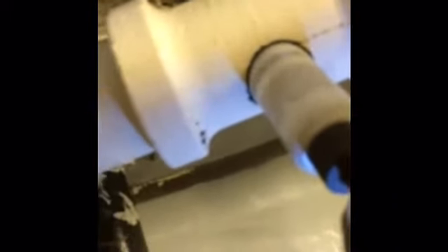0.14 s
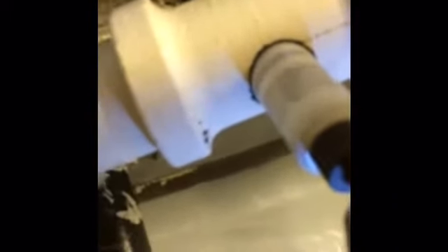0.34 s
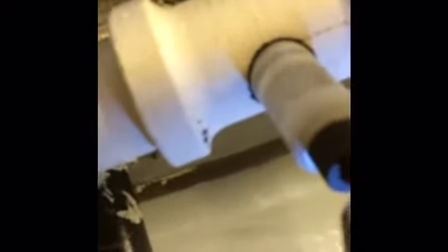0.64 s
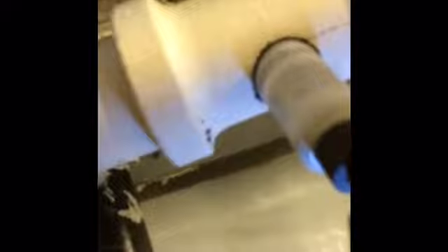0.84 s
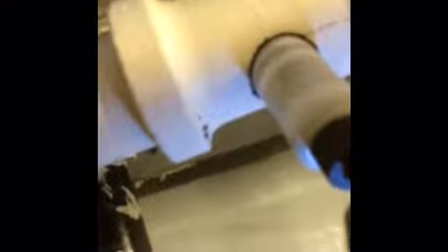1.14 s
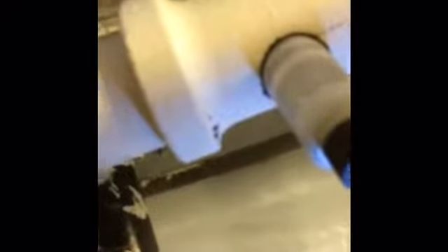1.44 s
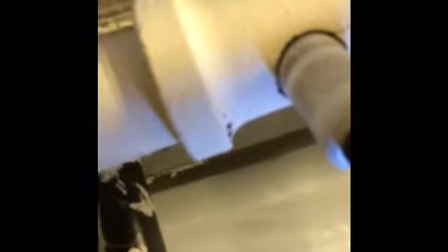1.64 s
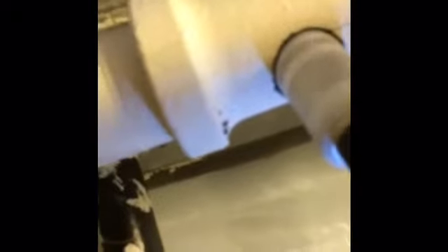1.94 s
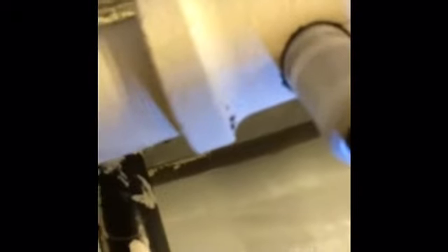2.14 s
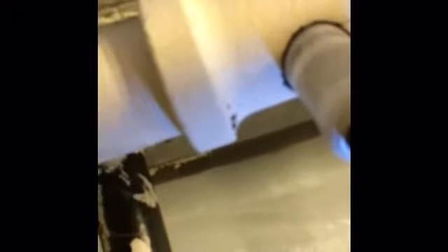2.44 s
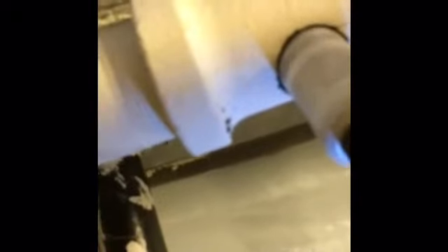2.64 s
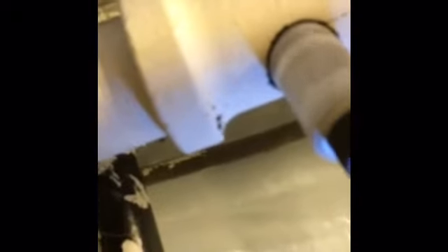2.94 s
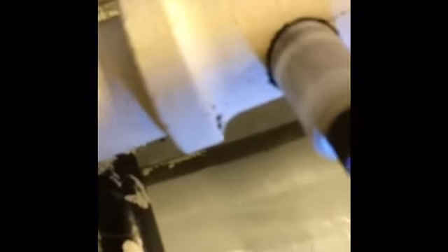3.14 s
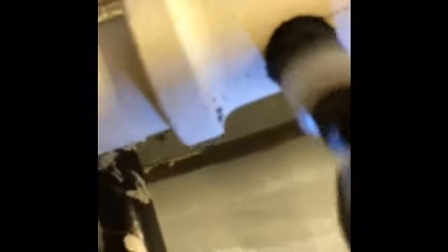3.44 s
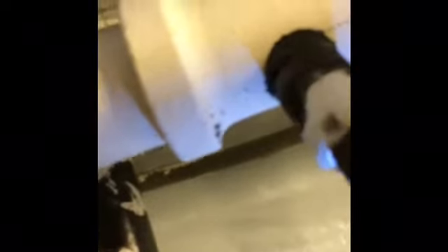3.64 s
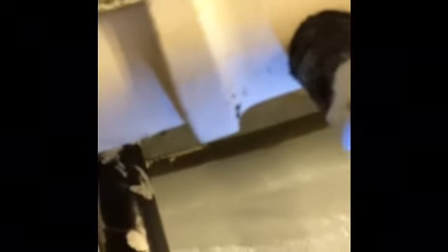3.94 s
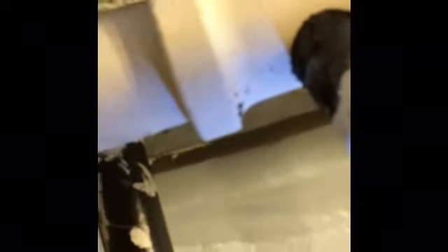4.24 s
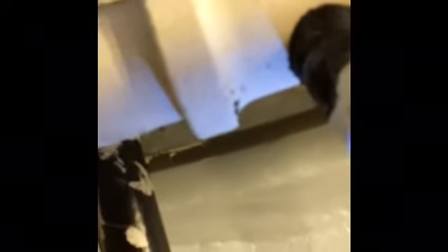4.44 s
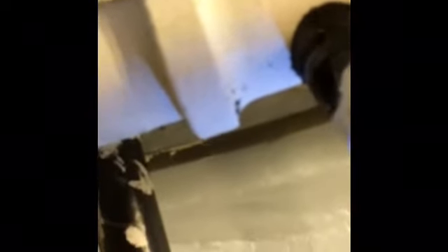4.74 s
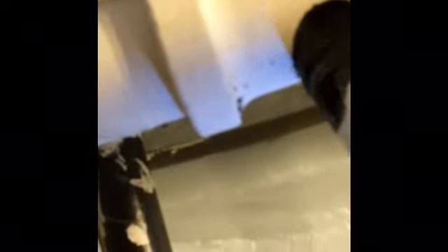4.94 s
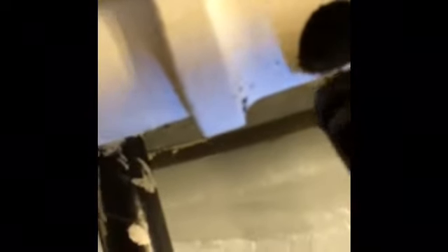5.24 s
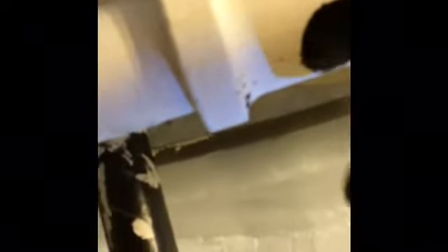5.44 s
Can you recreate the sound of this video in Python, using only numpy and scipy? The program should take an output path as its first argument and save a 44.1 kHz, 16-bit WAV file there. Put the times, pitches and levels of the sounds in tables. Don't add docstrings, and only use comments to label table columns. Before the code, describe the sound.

A cordless drill's hole saw rasps loudly through plastic pipe, breaks through, whirs free briefly, clacks to a stop, then chips patter and taps follow.

```python
import sys
import numpy as np
from scipy import signal
from scipy.fft import rfft, irfft
from scipy.io import wavfile
from scipy.ndimage import uniform_filter1d, minimum_filter1d

SR = 44100
rng = np.random.default_rng(int(sys.argv[2]) if len(sys.argv) > 2 else 0)


def level_to_linear(level):
    exponent = np.asarray(level, float) / 20
    return 10 ** exponent


def dump_mix(stems):
    frames = np.atleast_2d(stems).T
    limited = np.clip(frames, -1, 1)
    pcm = np.round(limited * 32767).astype(np.int16)
    wavfile.write(sys.argv[1], SR, pcm)


N = 246519
T = np.arange(N) / SR
MESHES_PER_TURN = 100
BREAK_S, STOP_S = 3.292, 3.545


def level(x, db=0):
    return x * level_to_linear(db) / np.sqrt(np.mean(x ** 2))


def curves(table):
    s, *columns = np.transpose(table)
    lasting = (T >= s[0] - .002) & (T <= s[-1] + .002)
    gate = uniform_filter1d(1. * lasting, size=120)
    return [np.interp(T, s, c) for c in columns] + [gate]


def walk(rate_hz):
    k = int(SR / rate_hz)
    held = np.repeat(rng.standard_normal(N // k + 1), k)
    return 1.3 * uniform_filter1d(uniform_filter1d(held, k), k)[:N]


def band(x, lo_hz, hi_hz):
    sos = signal.butter(2, (lo_hz, min(hi_hz, SR / 2.2)), "bandpass", fs=SR, output="sos")
    return signal.sosfilt(sos, x)


def colour(x, spectrum, peaks=()):
    f = np.arange(4097) * SR / 8192 + 1
    hz, db = np.transpose(spectrum)
    db = np.interp(np.log(f), np.log(hz), db)
    for peak_hz, width_hz, peak_db in peaks:
        db = db + peak_db / (1 + (2 * (f - peak_hz) / width_hz) ** 2)
    cep = irfft(db * np.log(10) / 20)
    cep[1:4096] *= 2
    cep[4097:] = 0
    return signal.fftconvolve(x, irfft(np.exp(rfft(cep))))[:N]


def grains(rough_db):
    size_db = rough_db * np.minimum(rng.exponential(size=N), 4)
    return rng.standard_normal(N) * level_to_linear(size_db)


def flicker(x, share_db):
    spec = rfft(x)
    octave = np.log2(np.arange(N // 2 + 1) * SR / N + 1)
    out = 0
    for c in np.arange(8.5, 14.6, .5):
        window = np.cos(np.pi * np.clip(octave - c, -.5, .5)) ** 2
        flutter_db = .45 * walk(12) + 1.3 * walk(70)
        out = out + irfft(spec * window, N) * level_to_linear(share_db(2 ** c) + flutter_db)
    return out


def add(out, s, sound):
    i = int(s * SR)
    out[i:i + len(sound)] += sound[:N - i]


def knock(events, t60_s):
    out, t = np.zeros(N), T[:SR // 5]
    for s, db, hz, crack_db in events:
        noise = rng.standard_normal(len(t))
        ring = 0.45 * np.sin(2 * np.pi * hz * t) + level(band(noise, 0.65 * hz, 1.45 * hz), -6)
        ring = ring * (1 - np.exp(-t * hz / 1.2))
        crack = level(band(noise, 830, 4300), crack_db) * level_to_linear(-30 * t / t60_s)
        envelope = level_to_linear(-60 * t / t60_s) * (1 - np.exp(-t / 0.0009))
        add(out, s, level_to_linear(db - 0.5) * (ring + crack) * envelope)
    return out


# frequency in Hz, density in dB per Hz.
AIR = [(18, -40.5), (30, -13), (112, -1.5), (199, -5), (239, -9), (473, -13), (649, -20.5), (6720, -30),
       (14400, -33.5), (16000, -40)]


def room_air():
    return level(colour(rng.standard_normal(N), AIR), -65)


def basement(x, t60_s, wet_db):
    t = T[:SR // 2]
    tail = signal.lfilter([1], [1, -.4], rng.standard_normal(len(t)))
    tail = tail * level_to_linear(-60 * t / t60_s) * (t > .004)
    return x + level_to_linear(wet_db) * signal.fftconvolve(x, tail / np.sqrt(np.sum(tail ** 2)))[:N]


# frequency in Hz, density in dB per Hz.
CHIPS = [(180, -11), (300, -28), (470, -15.5), (828, -19.5), (1810, -6.5), (2740, -9.5), (3700, -7),
         (10900, -8), (15000, -15.5), (16000, -21.5)]
# time in seconds, level in dB.
RAIN = [
    (3.58, -50),
    (3.75, -53),
    (3.94, -46),
    (4.1, -44.5),
    (4.4, -48),
    (4.85, -57.5),
    (5.03, -51),
    (5.19, -60.5),
    (5.59, -68.5),
]


def chip_rain():
    chips_db, gate = curves(RAIN)
    patter = grains(rough_db=2.8) * level_to_linear(.7 * walk(60))
    return gate * level_to_linear(chips_db + .4) * level(colour(patter, CHIPS))


# start in seconds, held seconds, mode in Hz, level in dB.
HUM = [(3.58, 0.04, 230, -43), (3.58, 0.066, 150, -41), (3.6, 0.063, 275, -45), (3.59, 0.046, 420, -48),
       (3.6, 0.069, 480, -50), (3.62, .1, 85, -53), (3.73, 0.26, 190, -50), (3.75, 0.19, 127, -55.5),
       (3.72, 0.14, 500, -64), (4.02, 0.069, 210, -50), (4.04, 0.11, 152, -46.5), (4.03, 0.065, 478, -53),
       (4.1, 0.036, 425, -58), (4.1, 0.11, 267, -60.5), (4.15, 0.14, 123, -52.5), (4.2, 0.22, 187, -56),
       (4.22, .25, 55, -64), (4.53, .18, 118, -52), (4.55, .08, 74, -60), (4.6, .25, 195, -65),
       (4.87, .04, 190, -57), (4.92, 0.075, 232, -54), (4.94, .05, 150, -51), (4.95, 0.042, 280, -58),
       (4.88, 0.093, 490, -61.5), (5.1, 0.095, 230, -56), (5.14, 0.08, 76, -53), (5.12, 0.11, 130, -54.5),
       (5.2, 0.099, 178, -56)]


def pipe_hum():
    out = 0
    for s, held_s, hz, db in HUM:
        rise_db, fall_db = 500 * (T - s), 202 * (s + held_s - T)
        shape_db = np.minimum(0, np.minimum(rise_db, fall_db))
        tone = np.sin(2 * np.pi * hz * T + .6 * walk(25))
        out = out + level_to_linear(db + shape_db - 2 + 3 * walk(25)) * tone
    return curves(RAIN)[-1] * out


# peak in seconds, rumble in dB, share of the upper rumble in dB.
NUDGES = [(3.58, -43.5, -5), (3.8, -63, -25), (3.95, -58, -12), (4.05, -46.5, -6), (4.1, -48, -13),
          (4.33, -64, -14), (4.56, -57, -16), (4.88, -60, -8), (4.96, -55, -8), (5.071, -47.5, -15),
          (5.21, -63, -14), (5.44, -69, -8)]


def scuffs():
    s, low_db, high_db = np.transpose(NUDGES)[:, :, None]
    shape_db = np.minimum(299 * (T - s), 112 * (s - T))
    out = 0
    for peak_db, lo_hz, hi_hz in ((low_db, 50, 280), (low_db + high_db, 280, 650)):
        rumble = level(band(grains(rough_db=6.5), lo_hz, hi_hz))
        out = out + level_to_linear(np.max(peak_db + shape_db, axis=0)) * rumble
    return curves(RAIN)[-1] * out


# start in seconds, peak in dB, mode in Hz, crack share in dB.
TAPS = [(3.906, -35, 3050, -10), (3.919, -39, 3950, 2), (4.037, -42.5, 3020, 6), (4.07, -39, 1100, -4),
        (4.101, -29, 509, -6), (4.102, -35, 1700, -9), (4.617, -42, 3610, -4), (4.739, -41, 593, -17),
        (4.88, -43, 1194, -14), (4.892, -48, 1250, -16), (4.908, -50, 1250, -8), (4.948, -41, 1250, -10),
        (4.962, -35.5, 1210, -17), (4.998, -42, 2770, -12), (5.021, -40, 2900, -7), (5.046, -43, 2100, -12),
        (5.064, -22, 1700, -12), (5.072, -34, 950, -9), (5.084, -34, 1180, -6), (5.091, -35, 1250, -8),
        (5.12, -45, 1600, -8), (4.91, -48, 4500, -8), (4.975, -43, 1700, -8), (5.097, -33, 1390, -8),
        (5.103, -35, 1500, -12), (5.146, -48, 2490, -8), (5.363, -47, 3880, -2), (5.507, -49, 4490, 4),
        (5.563, -47, 1390, -7), (5.579, -49, 1450, -13)]
# start in seconds, peak in dB, mode in Hz, crack share in dB.
SNAPS = [
    (3.646, -14, 3570, -4),
    (3.646, -22, 2100, -7),
    (3.646, -20.5, 5200, -12),
    (5.006, -20, 2470, -15),
    (5.009, -26, 3180, -9),
]


def taps_and_snaps():
    return knock(TAPS, t60_s=0.034) + knock(SNAPS, t60_s=0.011)


# start in seconds, peak in dB, centre in Hz.
TICKS = [(3.5506, 12.5, 11100), (3.553, 10, 12300), (3.5564, 2, 12800), (3.5674, -23, 7370),
         (3.5774, -15, 9600), (3.6449, -21, 11200), (4.039, -28, 6780), (4.1004, -39, 6170),
         (4.9716, -32, 6170), (4.9984, -40, 6790), (5.0055, -31, 5790), (5.0114, -42, 6400),
         (5.0454, -42, 5990), (5.062, -20, 8040), (5.0654, -29, 6690), (5.0724, -33, 7930),
         (5.0984, -41, 6850), (5.1088, -30, 6950), (5.1464, -46, 9600), (5.3024, -42.5, 7400),
         (5.364, -47, 6320), (5.506, -51, 9360), (5.5687, -40, 6660), (5.5814, -53, 6510)]


def tooth_ticks():
    out, t = np.zeros(N), T[:SR // 5]
    envelope = level_to_linear(-60 * t / 0.013) * (1 - np.exp(-t / 0.00039))
    for s, db, hz in TICKS:
        noise = rng.standard_normal(len(t))
        tick = level(band(noise, .9 * hz, 1.1 * hz), -2) + level(band(noise, 5000, 10900), -10.5)
        add(out, s, level_to_linear(db - 6) * tick * envelope)
    return out


# start in seconds, peak in dB, frequency in Hz.
JOLTS = [(2.606, -14, 116), (2.779, -26, 141), (3.168, -24.5, 69), (3.18, -7, 118), (3.2015, -7.5, 115.3),
         (3.217, -19.5, 80.4), (3.228, -21.5, 75.2), (3.2391, -8.5, 171), (3.263, -17, 70),
         (3.273, -14, 69), (4.543, -43, 118), (4.945, -33, 156), (5.425, -46, 116)]
# start in seconds, peak in dB, frequency in Hz, decay to -60 dB in seconds.
THUDS = [(3.67, -22, 180, 0.11), (3.629, -45, 264, 0.18), (4.1, -33, 1300, 0.029), (4.1, -38, 900, 0.028),
         (5.065, -30.5, 600, 0.034), (5.064, -13.5, 1320, 0.013), (5.0661, -19, 1687, 0.022),
         (5.064, -26, 4500, .015), (5.006, -34, 3300, .03), (5.505, -55, 1350, 0.065),
         (5.562, -50, 1380, 0.07), (5.58, -55, 1300, 0.058), (5.581, -52, 6500, .04),
         (5.0775, -22, 87, 0.087), (5.0715, -34, -88, .03), (5.075, -38.5, 226, 0.14),
         (5.25, -58, 520, 0.053), (5.423, -53, 400, 0.034)]


def jolts_and_thuds():
    out, t = np.zeros(N), T[:SR // 5]
    for s, db, hz, t60_s in [(*jolt, 0.039) for jolt in JOLTS] + THUDS:
        envelope = level_to_linear(-60 * t / t60_s) * (1 - np.exp(-t / 0.00067))
        add(out, s, level_to_linear(db) * np.sin(2 * np.pi * hz * t) * envelope)
    return out


# start in seconds, peak in dB, mode in Hz, crack share in dB.
BRAKE = [
    (3.546, -15, 4800, 8),
    (3.551, -2, 4050, 7),
    (3.553, -22.5, 5740, 1),
    (3.557, -12, 2070, -15),
    (3.575, -12.5, 4850, 5),
    (3.578, -12, 1230, -24),
    (3.603, -24.5, 1760, 1),
]


def brake_clatter():
    return knock(BRAKE, t60_s=0.026)


# time in seconds, level in dB.
SPIN = [
    (3.29, -16),
    (3.33, -22),
    (3.385, -16),
    (3.47, -21.5),
    (3.545, -21),
    (3.57, -18.5),
    (3.61, -34),
    (3.68, -49.5),
    (3.72, -52),
]
# frequency in Hz, density in dB per Hz.
WHIRR = [(35, -58), (60, -18), (274, -12), (354, -16), (437, -8), (1060, -8), (1580, -4.5), (2580, -8.5),
         (3120, -5), (4220, -8), (11800, -16), (14900, -25.5), (16000, -23.5)]
# multiple of the turn, level in dB.
SPIN_HUM = [(5, -21.5), (9, -16.5), (15, -20)]


def free_spin(turns, mesh_hz):
    spin_db, gate = curves(SPIN)
    fast = np.clip((mesh_hz - 3040) / (3115 - 3040), 0, 1)
    treble_db = 4.5 - 4 * fast - 4.5 * (T > STOP_S + .03)
    rattle = level_to_linear(1.2 * np.cos(4 * np.pi * turns) + 1.1 * walk(90))
    whirr = colour(grains(rough_db=2.5) * rattle, WHIRR)
    whirr = flicker(whirr, lambda hz: treble_db * (hz > 5000))
    hum = sum(level_to_linear(db + 2 * walk(19)) * np.sin(2 * np.pi * round(k) * turns) for k, db in SPIN_HUM)
    low_spectrum = [(60, -22.0), (150, -7.5), (300, -7.5), (420, -25.5)]
    low = colour(rng.standard_normal(N), low_spectrum, [(275, 13, 5.8)])
    return gate * level_to_linear(spin_db - 2.15) * (level(whirr) + level(low, -15) + hum)


# time in seconds, mesh frequency in Hz.
MESH = [(0, 2520), (.6, 2540), (1.4, 2555), (1.75, 2540), (1.95, 2560), (2.25, 2510), (2.45, 2550),
        (2.55, 2560), (2.59, 2630), (2.73, 2645), (2.78, 2595), (2.95, 2610), (3.03, 2570), (3.15, 2625),
        (3.285, 2550), (3.305, 2770), (3.32, 2830), (3.345, 3040), (3.37, 3085), (3.41, 3125), (3.44, 3105),
        (3.465, 3035), (3.52, 3020), (3.55, 2900)]


def saw_speed():
    mesh_hz = curves(MESH)[0]
    return mesh_hz, np.cumsum(mesh_hz) / SR / MESHES_PER_TURN


# multiple of the mesh, level in dB.
WHINE = [(.5, -10), (1, 0), (2, -11), (2.1, -11)]
# time in seconds, whine in dB.
GEAR_LOAD = [(0, -36), (1.4, -35), (1.7, -37), (1.8, -31), (1.9, -34), (2.05, -31.5), (2.2, -39),
             (2.4, -36), (2.45, -33), (2.55, -34), (2.6, -31), (2.95, -31), (3.05, -34), (3.295, -34),
             (3.312, -21), (3.325, -38), (3.358, -36), (3.372, -22), (3.435, -22.5), (3.455, -32),
             (3.515, -26), (3.535, -45)]


def gears(mesh_hz):
    whine_db, gate = curves(GEAR_LOAD)
    dragging = T < BREAK_S
    whine_db = whine_db + 1.5 * dragging * walk(15)
    jitter = np.where(dragging, .009, .003) * walk(70)
    phase = 2 * np.pi * np.cumsum(mesh_hz * (1 + jitter)) / SR
    beat = 1 + 0.21 * np.cos(2 * phase / MESHES_PER_TURN)
    flutter_db = np.where(dragging, 2.5, 1.2)
    whine = sum(level_to_linear(db + flutter_db * walk(40)) * np.sin(k * phase) for k, db in WHINE)
    return gate * level_to_linear(whine_db) * beat * whine


# start in seconds, peak in dB, mode in Hz, crack share in dB.
BITES = [(0.904, -8.5, 1180, -3), (1.058, -13.5, 1650, 1.5), (3.199, -6, 1480, -0.5),
         (3.237, -2, 1650, -11.5), (3.239, -4, 623, -16), (3.258, -10.5, 2510, -7), (3.263, -3.5, 554, -14),
         (3.282, -5.5, 1910, 1), (3.356, -13, 1530, -20.5), (3.389, -37, 3150, -10.5),
         (3.458, -12, 1200, -6), (3.51, -20, 1010, -11)]
# start in seconds, peak in dB, mode in Hz.
CATCHES = [(0.0967, -18, 1720), (0.1828, -8, 1450), (0.416, -12, 1390), (0.4324, -4, 1360),
           (0.4958, -8.5, 1700), (0.5352, -6, 1710), (0.6871, -7.5, 1650), (1.2146, -7, 1270),
           (1.27, -16, 1180), (1.3383, -13, 1220), (1.4657, -5.5, 1650), (1.508, -7, 1350),
           (1.6003, -7.5, 1680), (1.7027, -14.5, 1300), (1.7779, -9, 1440), (1.795, -11, 1340),
           (1.8562, -6, 1380), (1.8976, -12.5, 1850), (1.9754, -8, 1230), (2.0646, -10, 1360),
           (2.14, -6.5, 1620), (2.3436, -16, 1730), (2.3635, -9.5, 1410), (2.4234, -20.5, 1710),
           (2.4633, -10, 1640), (2.612, -13, 1600), (2.704, -11, 1340), (2.8539, -3.5, 1644),
           (3.043, -13, 1190), (3.1036, -9, 1750)]
# start in seconds, peak in dB, mode in Hz.
SCRAPES = [(0.0243, -5, 5500), (0.1176, -11.5, 4840), (0.315, -4.5, 5360), (0.4196, 0, 4100),
           (0.4539, -5.5, 3980), (0.6648, -0.5, 4100), (0.7662, -1, 5370), (0.8804, -4, 4480),
           (1.1942, -3.5, 5170), (1.2161, -1.5, 4370), (1.4656, -2.5, 4970), (2.0477, -5.5, 5140),
           (2.141, -6, 5270), (2.1809, -3.5, 4170), (2.497, -5, 5900), (2.739, -4.5, 5970),
           (2.7788, -2, 5900), (2.7995, -4, 5740), (3.2605, -3, 4020)]


def tooth_knocks():
    crack_db = -6.5
    catches = [(s, db - 2.5, hz, crack_db) for s, db, hz in CATCHES]
    scrapes = [(s, db + 0.5, hz, crack_db) for s, db, hz in SCRAPES]
    return knock(catches, t60_s=0.038) + knock(scrapes, t60_s=.02) + knock(BITES, t60_s=0.038)


# centre in seconds, squeal gain in dB.
RUBS = [
    (0.25, -14),
    (1.68, 3.5),
    (2.3, 3),
    (2.495, 13.5),
    (2.55, 3.5),
    (2.75, 7),
    (2.95, -5.5),
    (3.03, 4.5),
    (3.2, -18.5),
]


def cup_squeal(depth_s):
    squeal_db = 3.5 * depth_s
    for s, db in RUBS:
        squeal_db = squeal_db + db * np.exp(-((T - s) / .022) ** 2 / 2)
    return level_to_linear(squeal_db) * level(band(grains(rough_db=2.0), 5620, 5880), -20.0)


# frequency in Hz, density in dB per Hz.
SHAKE = [(18, -49.5), (30, -18), (91, -11), (134, 3), (199, -5.5), (314, 5), (673, -3), (1000, 1.5),
         (1300, -35.5), (2200, -120)]
# multiple of the turn, level in dB.
WOBBLE = [(3, -11.5), (4, -14), (5, -4), (6, -2.5), (7, -5.5), (8, -3), (9, 0), (10, -7.5), (11, -14),
          (12, -5), (13, -7.5), (15, -2), (17, -0.5)]
# multiple of the turn, centre in seconds, half length in seconds, gain in dB.
SWAYS = [(5, .35, .25, 4.5), (5, 4.1, 0.092, 22.5), (6, 1.2, 0.57, 6), (6, 2.95, 0.16, 3), (7, .2, 0.18, 8),
         (7, 1.1, .25, 9), (10, 3.5, 0.2, 10.5), (11, .65, .1, 5), (11, 4.4, .12, 3.5), (12, .1, .15, 5.5),
         (12, 0.58, .12, 7.5), (3, 0.59, .1, 6)]


def pipe_shake(angle, bite_db):
    wobble = 0
    for k, db in WOBBLE:
        sway_db = sum(gain_db * np.exp(-((T - s) / half_s) ** 4)
                      for m, s, half_s, gain_db in SWAYS if round(m) == round(k))
        tone = np.sin(round(k) * angle + .4 * walk(4) + k * k)
        wobble = wobble + level_to_linear(db + sway_db + 2 * walk(2.5)) * tone
    rumble = colour(grains(rough_db=3) * level_to_linear(bite_db), SHAKE, [(125, 14, 5), (270, 14, 6)])
    return level(wobble, -5) + level(rumble, -.5)


# time in seconds, tearing in dB.
FEED = [
    (0, -12.5),
    (0.03, -11.5),
    (0.76, -12),
    (1.32, -13),
    (1.68, -12),
    (2.6, -12.5),
    (2.85, -13),
    (3.02, -13),
    (3.14, -10),
    (3.29, -8),
]
# frequency in Hz, density in dB per Hz.
TEAR = [(290, -43.5), (500, -7), (868, -9.5), (1340, -2), (1690, -2), (2130, -5), (2610, -6.5), (2810, -9),
        (3700, -1), (5090, -1.5), (8830, -5), (11000, 1.5), (14900, -4), (16000, -7.5)]
# frequency in Hz, width in Hz, gain in dB.
RING = [(1180, 100, 6.5), (1340, 62, 5.5), (1500, 80, -1.5), (1675, 110, 5), (1880, 77, 2), (2550, 150, -2),
        (3870, 260, 0.5), (4170, 230, 1.5), (4800, 150, 1), (5125, 600, 4.5), (10880, 460, 3),
        (12300, 250, 3), (14120, 130, -2), (12800, 300, -0.5)]


def cutting(turns):
    tear_db = curves(FEED)[0]
    depth_s = T - BREAK_S / 2
    wall_db = -.6 * depth_s + .4 * walk(9.6)
    shake_db = -19 + walk(9.6)
    angle = 2 * np.pi * turns
    bite_db = 0
    for k, db, lag in ((1, 0.27, 0.36), (2, 0.96, 0.29), (3, 0.25, 0.74), (4, 0.85, 1.9)):
        bite_db = bite_db + db * np.cos(k * angle + lag)
    chatter = np.cos(2 * np.pi * 47 * (T - 3.284)) - .3
    bite_db = bite_db + 3.5 * (T > BREAK_S - .11) * chatter
    rasp_db = 1.3 * walk(250)
    tear = colour(grains(rough_db=2.5) * level_to_linear(bite_db + rasp_db), TEAR, RING)
    tear = level(flicker(tear, lambda hz: wall_db * (hz < 2500)), .8)
    shake = level_to_linear(shake_db) * pipe_shake(angle, bite_db)
    return (T < BREAK_S) * level_to_linear(tear_db) * (tear + cup_squeal(depth_s) + shake)


def scene():
    mesh_hz, turns = saw_speed()
    knocks = taps_and_snaps() + tooth_ticks() + jolts_and_thuds() + brake_clatter() + tooth_knocks()
    drill = free_spin(turns, mesh_hz) + gears(mesh_hz) + cutting(turns) + knocks
    aftermath = chip_rain() + pipe_hum() + scuffs()
    return (basement(drill, t60_s=0.32, wet_db=-23.5) + aftermath + room_air())[None]


def low_pass(x):
    return signal.sosfilt(signal.butter(12, 15400, fs=SR, output="sos"), x)


def record(dry):
    dull = signal.sosfilt(signal.ellip(12, .2, 80, 15300, fs=SR, output="sos"), dry)
    gain = minimum_filter1d(np.minimum(1, .93 / (np.abs(dull) + 1e-9)), size=61)
    held = dull * uniform_filter1d(gain, size=61)
    return low_pass(held)


dry = scene()
out = record(dry)
dump_mix(out)
```